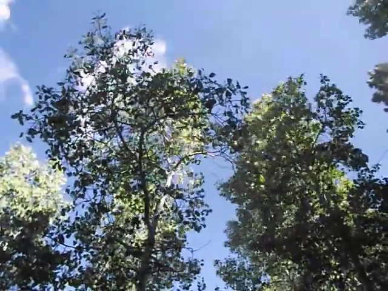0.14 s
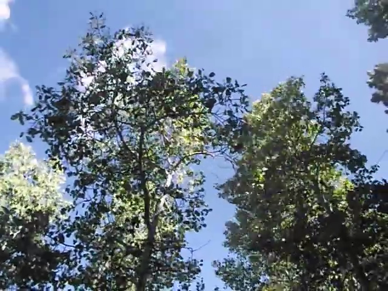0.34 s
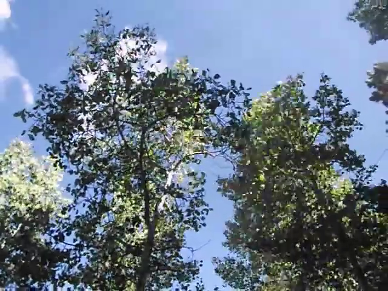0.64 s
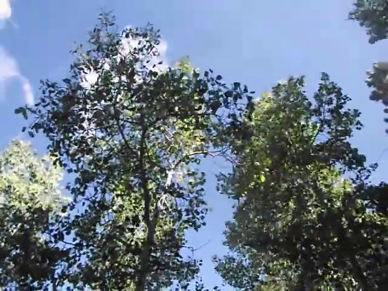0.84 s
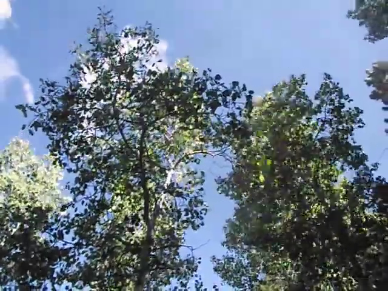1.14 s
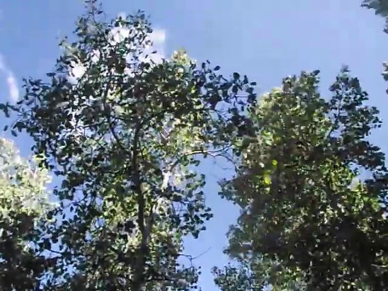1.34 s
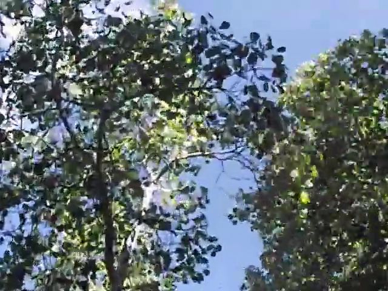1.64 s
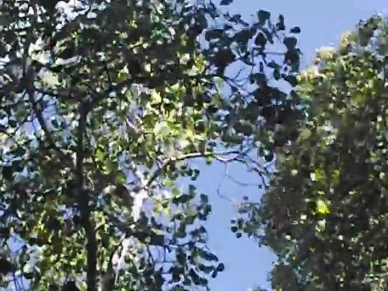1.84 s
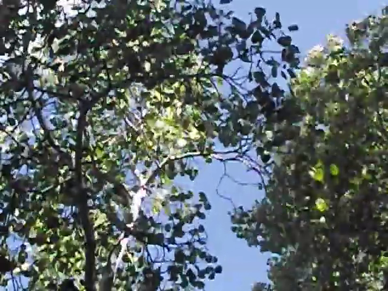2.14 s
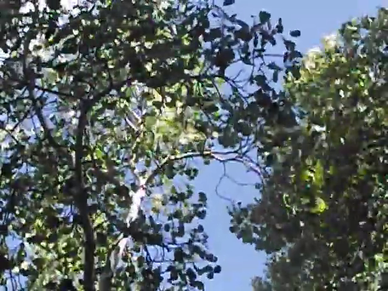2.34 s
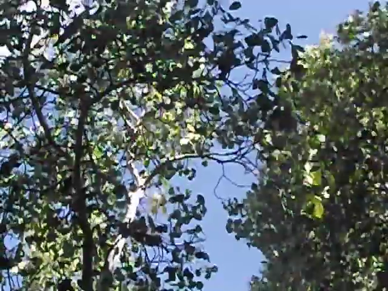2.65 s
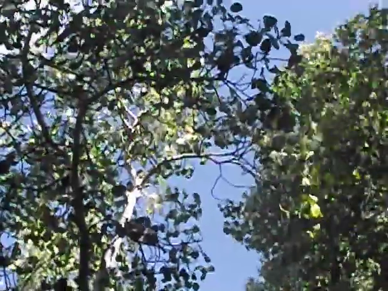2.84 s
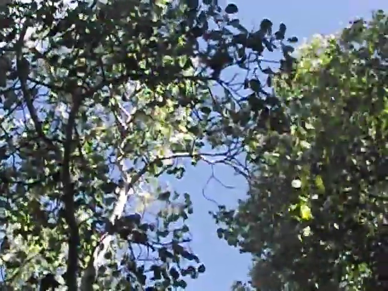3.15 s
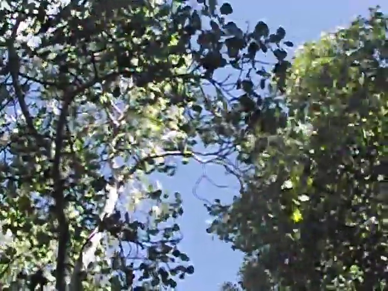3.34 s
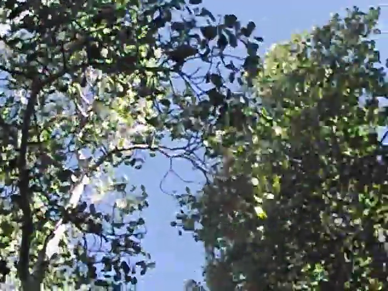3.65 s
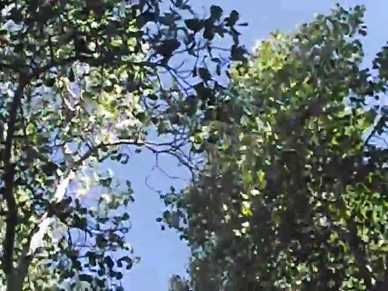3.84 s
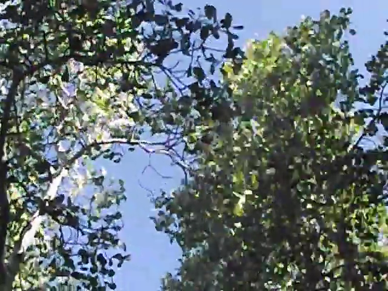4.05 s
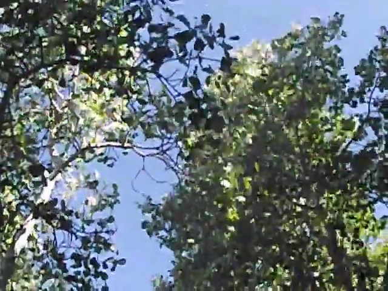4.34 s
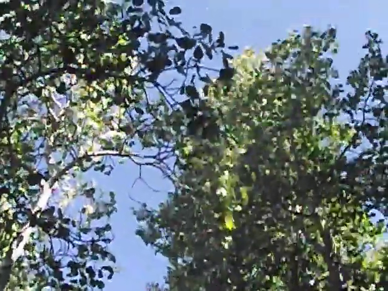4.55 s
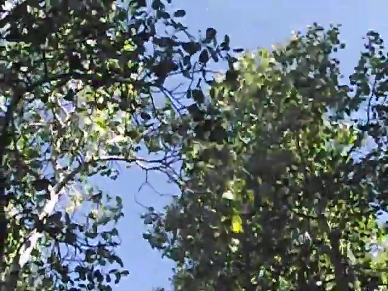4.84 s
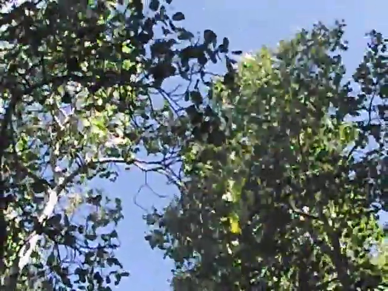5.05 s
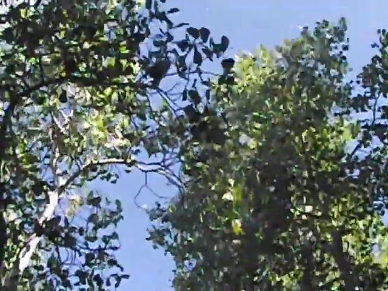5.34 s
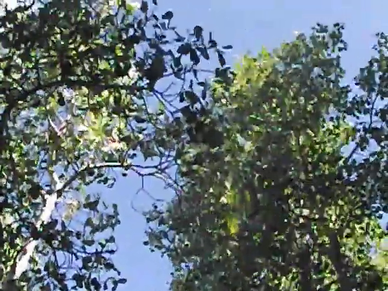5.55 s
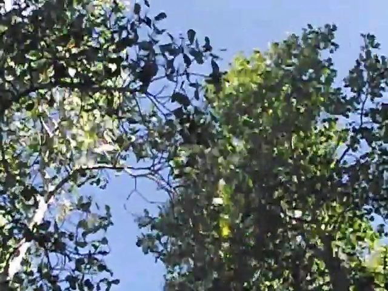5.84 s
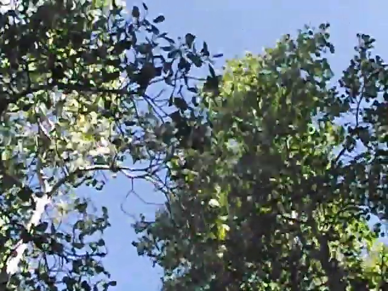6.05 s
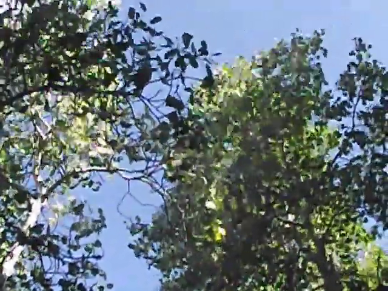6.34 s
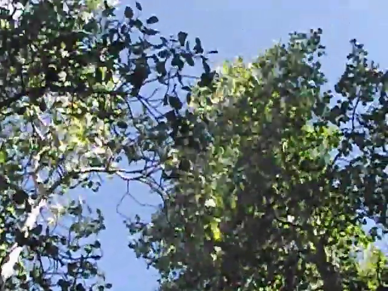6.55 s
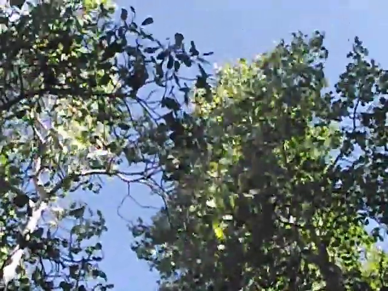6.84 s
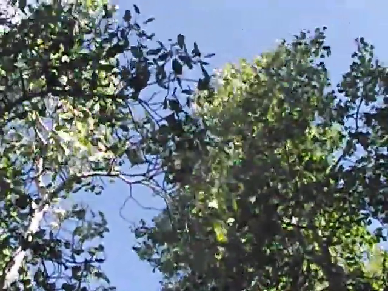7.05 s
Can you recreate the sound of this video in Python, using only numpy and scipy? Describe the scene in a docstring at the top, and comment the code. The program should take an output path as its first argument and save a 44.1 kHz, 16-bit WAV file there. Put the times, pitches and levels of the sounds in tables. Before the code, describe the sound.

Thousands of leaves flutter overhead as one smooth, slightly shimmering hiss, gradually quieter as the breeze dies. Fingers make faint ticks on a handheld camera's plastic case, and a single button snap bursts out harsh and overloaded at about four seconds. Gentle low air thumps come at the start and cluster again near the end. Open woodland, one small microphone, narrow and dull on top, with a barely audible low hum.

```python
"""Leaves in a fading breeze

Thousands of leaves flutter overhead, made from coloured noise, with duller noise for trees farther off.
A small hand-held camera hears them: air buffets its one microphone with slow noise and single bumps.
Fingers tick on its plastic case, which rings as short fading tones; one button snap overloads the recorder.
A faint hum, a sine wave of wavering strength, sits underneath."""
import sys
import numpy as np
from scipy import signal
from scipy.io import wavfile
from scipy.ndimage import uniform_filter1d

SR = 44100
rng = np.random.default_rng(int(sys.argv[2]) if len(sys.argv) > 2 else 0)


def boost_factor(decibels):
    """Convert a level in decibels to a linear amplitude factor."""
    exponent = np.asarray(decibels, float) / 20
    return 10 ** exponent


def waveform_to_disk(signal):
    """Save audio, clipped to [-1, 1], as 16-bit WAV at the path in sys.argv[1]."""
    frames = np.transpose(np.atleast_2d(signal))
    scaled = np.clip(frames, -1, 1) * 32767
    samples = np.round(scaled).astype(np.int16)
    wavfile.write(sys.argv[1], SR, samples)


N = 317961  # length [samples]

# The breeze in the treetops, slowly dying down: (time [s], leaf level [dB])
BREEZE = [(0.0, -33), (1.8, -33), (3.6, -36), (5.9, -37.5), (7.21, -39)]
# Colour of the near leaves: (frequency [Hz], relative level [dB per Hz])
LEAF_COLOUR = [(700, -46), (1200, -19.5), (1800, -13), (2400, -6.5), (2800, -3.5), (3250, -1.5),
               (3900, -7.5), (4900, -13.5), (5200, -17.5), (5400, -25.5), (5750, -25), (6200, -18),
               (6450, -100)]
# What the plastic case rings with:
# (frequency [Hz], relative level [dB], time to fall by 60 dB [s], first swing of the wall by the microphone)
CASE_MODES = [(470, -44.5, 0.08, "out"), (892, -17, 0.046, "out"), (1573, -24, 0.037, "out"),
              (1870, -27, 0.024, "out"), (2066, -25, 0.043, "out"), (2265, -7.5, 0.013, "in"),
              (2574, -10.5, 0.012, "out"), (2760, -0.5, 0.013, "out"), (3030, -1.5, 0.0094, "in"),
              (3350, -5.5, 0.01, "out"), (5200, -29, 0.0067, "out")]
# Touches on the case: (time [s], peak level [dB], best-rung pitch [Hz],
# loss away from that pitch [dB per octave], rise time [cycles of each mode])
TAPS = [(1.415, -29, 470, 36, 2.6), (3.5675, -20.5, 2300, 36, 7.3), (3.841, -33, 880, 30.5, 2.5),
        (3.895, -36, 880, 35, 2.3), (4.012, 9, 2760, 1, 1.3), (5.7907, -22, 2760, 23, 1.5),
        (6.253, -29, 2600, -1, 6.9), (6.266, -23, 2900, 15, 5)]
# Gusts reaching the microphone opening: (time [s], eddy level [dB])
GUSTS = [(0.0, -37), (0.6, -39), (1.5, -52), (3.6, -51.5), (4.3, -41), (4.95, -47.5), (5.35, -36),
         (5.7, -39.5), (6.1, -40), (6.45, -46), (7.21, -48)]
# Colour of the lumpy eddies: (frequency [Hz], relative level [dB per Hz])
EDDY_COLOUR = [(1, -9), (4, -12), (12, 2.5), (20, -0.5), (40, -19.5), (100, -63.5)]
# Colour of the steadier rumble: (frequency [Hz], relative level [dB per Hz])
RUMBLE_COLOUR = [(5, -20.5), (15, -3.5), (30, 0), (45, -6.5), (70, -11.5), (120, -27.5), (300, -62)]
# Single lumps of air on the opening: (time [s], peak level [dB], length of first swing [s], direction)
BUMPS = [(0.146, -24, 0.017, "push"), (0.467, -28, .045, "suck"), (1.01, -32.5, 0.045, "push"),
         (1.81, -33, 0.035, "suck"), (4.667, -31, 0.029, "suck"), (5.243, -26.5, 0.032, "push"),
         (5.497, -26.5, 0.033, "push"), (5.761, -28.5, 0.047, "push"), (5.93, -34, 0.048, "push"),
         (6.111, -28, 0.087, "suck"), (6.171, -19, 0.046, "push"), (6.254, -32, 0.023, "push")]
# Colour of the more distant trees: (frequency [Hz], relative level [dB per Hz])
WOODS_COLOUR = [(40, -19), (90, -3), (200, -2.5), (420, -4), (550, -4), (900, -4), (1700, -8), (3000, -18),
                (5000, -30), (6000, -75)]

# Mean levels [dB], and how far each layer moves per dB of gust or breeze [dB per dB]
RUMBLE_DB, RUMBLE_SHARE = -43, 0.22
WOODS_DB, WOODS_SHARE = -42, 0.7
HUM_HZ, HUM_DB = 119, -58.5  # pitch [Hz], middle of the wavering peak level [dB]
OFFSET = -0.0029  # constant shift of the wave [full scale]
CONVERTER_TOP, OUTPUT_TOP = 0.645, 0.708  # clipping limits [full scale]
BAND_HZ = 5700  # treble cutoff [Hz]


def evened(x):
    """Scales a signal to an rms (average strength) of 1."""
    return x / np.sqrt(np.mean(x ** 2) + 1e-20)


def follow(rows):
    """Draws straight lines between rows of (time [s], level [dB]), giving a level for every sample."""
    times, levels_db = np.transpose(rows)
    return np.interp(np.arange(N) / SR, times, levels_db)


def in_step(rows, mean_db, share):
    """Gain of a layer that moves about its own mean level by a share of the control's swing."""
    control_db = follow(rows)
    return boost_factor(mean_db + share * (control_db - control_db.mean()))


def add(mix, start, sound):
    """Mixes a sound in at a start time [s]."""
    part = mix[round(start * SR):][:len(sound)]
    part += sound[:len(part)]


def hiss(colour, patchy_db, flicker_db, size):
    """Coloured noise from random spectra, with drifting patches and a flicker shared by all pitches."""
    frames = 4 * N // size + 5
    hz = np.fft.rfftfreq(size, 1 / SR)
    real, imaginary, patches = rng.standard_normal((frames, len(hz), 3)).T

    # Smooth over neighbouring pitches, then over time
    patches = uniform_filter1d(patches, size=9, axis=0)
    patches = evened(uniform_filter1d(patches, size=9, axis=1))
    flicker = evened(uniform_filter1d(rng.standard_normal(frames), size=5))

    colour_hz, colour_db = np.transpose(colour)
    level_db = np.interp(np.log(hz + 1), np.log(colour_hz + 1), colour_db)[:, None]
    level_db = level_db + patchy_db * patches + flicker_db * flicker
    spectra = (real + 1j * imaginary) * boost_factor(level_db)
    noise = signal.istft(spectra, nperseg=size, noverlap=3 * size // 4)[1]
    return evened(noise[:N])


def leaves():
    """So many far leaves clap at once that they fuse to a hiss, shimmering slightly as twigs shake."""
    return boost_factor(follow(BREEZE)) * hiss(LEAF_COLOUR, patchy_db=0.42, flicker_db=0.32, size=512)


def case_ring(best_hz, fall_db, rise_cycles):
    """Sums the tones of the case: those near the touched part's pitch ring most, low ones build up slower."""
    t = np.arange(5000) / SR
    ring = np.zeros(len(t))
    for hz, mode_db, t60, swing in CASE_MODES:
        octaves_away = abs(np.log2(hz / best_hz))
        fading = boost_factor(mode_db - fall_db * octaves_away - 60 * t / t60)
        rise = 1 - np.exp(-(t * hz / rise_cycles) ** 2)
        sign = 1 if swing == "out" else -1
        ring += sign * fading * rise * np.sin(2 * np.pi * hz * t)
    return ring / abs(ring).max()


def taps():
    """Each touch sets the plastic case ringing briefly, at its own peak level."""
    out = np.zeros(N)
    for start, peak_db, best_hz, fall_db, rise_cycles in TAPS:
        add(out, start, boost_factor(peak_db) * case_ring(best_hz, fall_db, rise_cycles))
    return out


def air_bump(length):
    """One lump of air: a quick swing of pressure that swings back a little and dies away."""
    u = np.arange(0, 4 * length, 1 / SR) / length
    onset = 1 - np.exp(-u / 0.087)
    lump = np.sin(np.pi * u) * np.exp(-1.5 * u) * onset
    return lump / lump.max()


def buffeting():
    """Moving air presses on the microphone opening: lumpy eddies, a steadier rumble and single bumps."""
    eddies = hiss(EDDY_COLOUR, patchy_db=2.0, flicker_db=1.5, size=16384)
    rumble = hiss(RUMBLE_COLOUR, patchy_db=2.0, flicker_db=0.0, size=16384)
    out = boost_factor(follow(GUSTS)) * eddies
    out += in_step(GUSTS, RUMBLE_DB, RUMBLE_SHARE) * rumble
    for start, peak_db, length, direction in BUMPS:
        sign = 1 if direction == "push" else -1
        add(out, start, sign * boost_factor(peak_db) * air_bump(length))
    return out


def woods():
    """The same breeze in more distant trees makes a smooth, dull wash."""
    wash = hiss(WOODS_COLOUR, patchy_db=0.18, flicker_db=0.07, size=2048)
    return in_step(BREEZE, WOODS_DB, WOODS_SHARE) * wash


def hum():
    """A faint sine wave of steady pitch that wavers in strength."""
    waver = uniform_filter1d(rng.standard_normal(N), size=9000)
    waver = evened(uniform_filter1d(waver, size=9000))
    tone = np.sin(2 * np.pi * HUM_HZ * np.arange(N) / SR)
    return boost_factor(HUM_DB + 2.5 * waver) * tone


def scene():
    """One microphone feeds both channels."""
    mono = leaves() + taps() + buffeting() + woods() + hum()
    return np.array([mono, mono])


def top_cut(x):
    """Nothing passes above the cut-off."""
    return signal.sosfilt(signal.butter(12, 16500, fs=SR, output="sos"), x)


def record(dry):
    """The converter clips and cuts the treble; rounded peaks overshoot and are shaved again at the output."""
    held = np.clip(dry + OFFSET, -CONVERTER_TOP, CONVERTER_TOP)
    lowpass = signal.firwin(161, BAND_HZ, window=("kaiser", 10), fs=SR)
    narrow = signal.oaconvolve(held, lowpass[None], "same")
    shaved = np.clip(narrow, -OUTPUT_TOP, OUTPUT_TOP)
    return top_cut(shaved)


dry = scene()
out = record(dry)
waveform_to_disk(out)
```